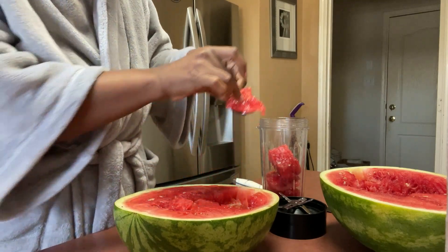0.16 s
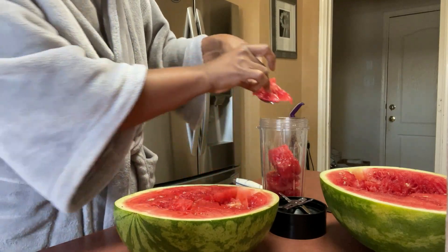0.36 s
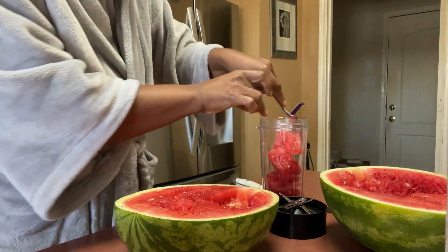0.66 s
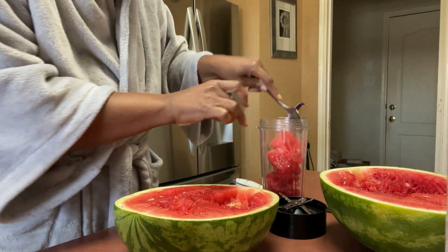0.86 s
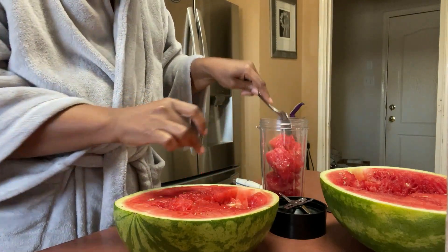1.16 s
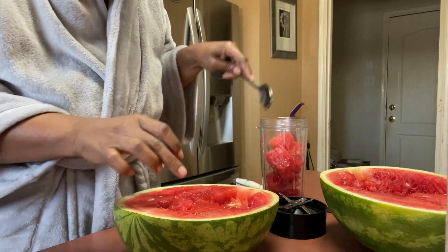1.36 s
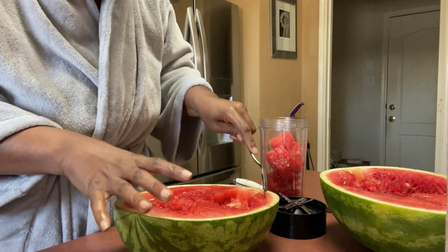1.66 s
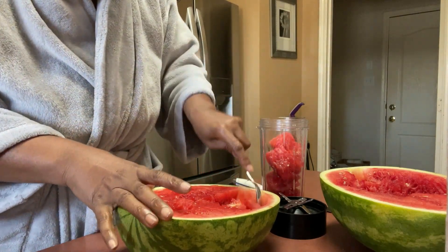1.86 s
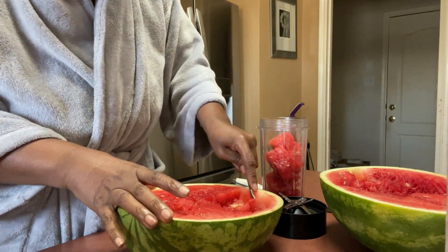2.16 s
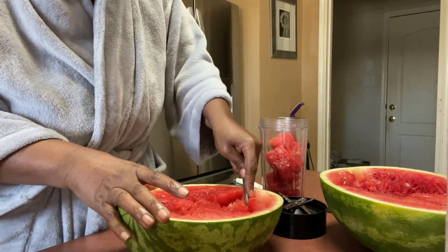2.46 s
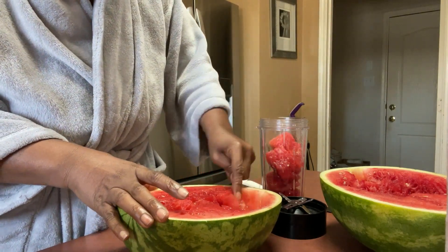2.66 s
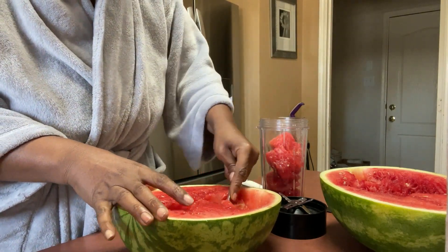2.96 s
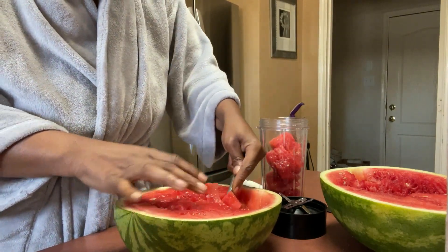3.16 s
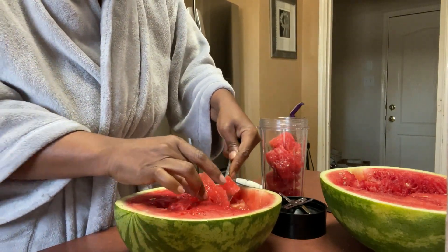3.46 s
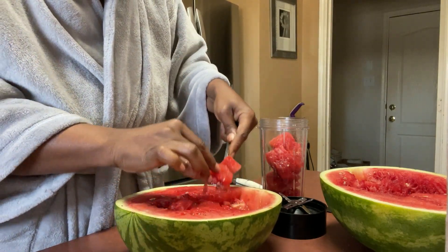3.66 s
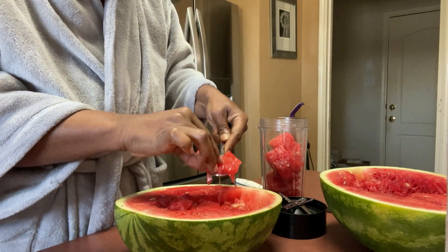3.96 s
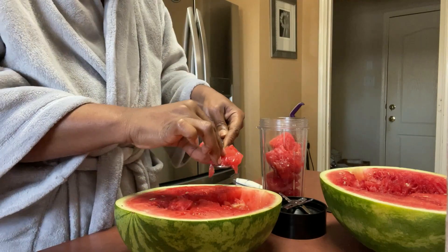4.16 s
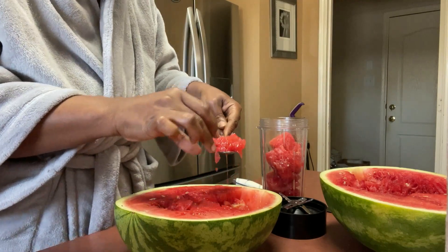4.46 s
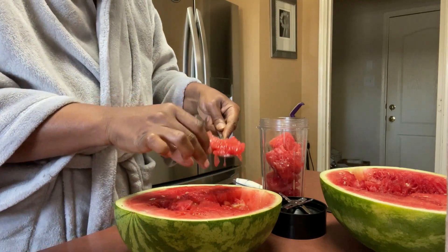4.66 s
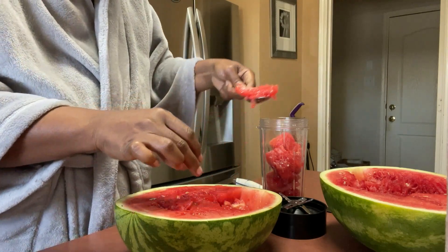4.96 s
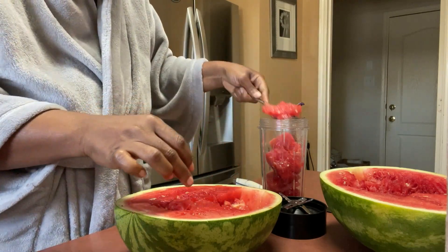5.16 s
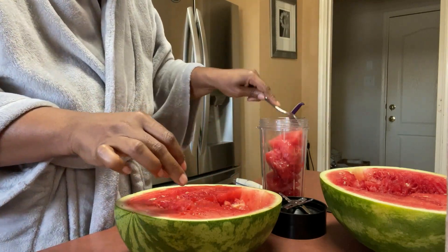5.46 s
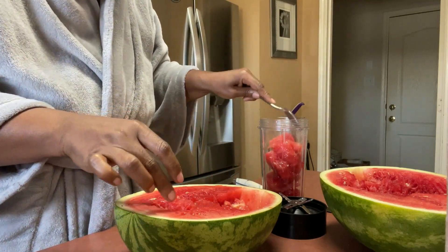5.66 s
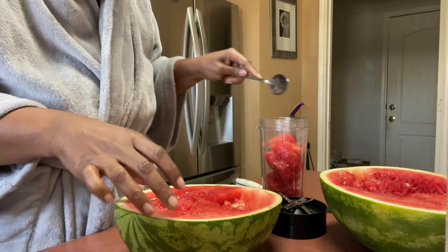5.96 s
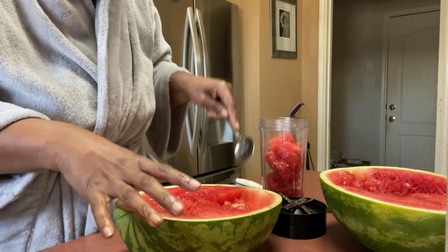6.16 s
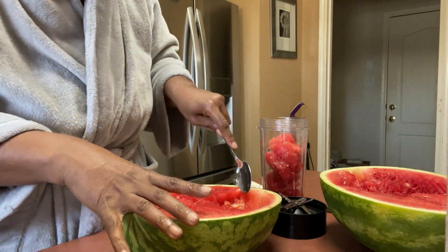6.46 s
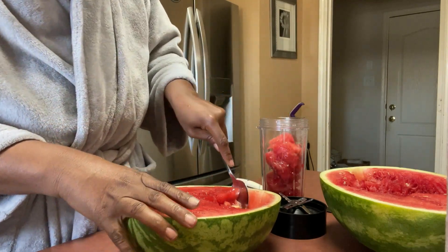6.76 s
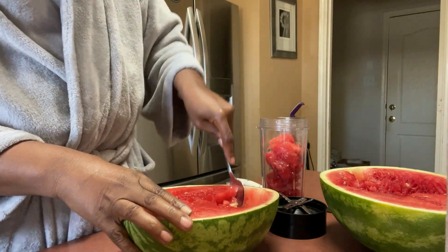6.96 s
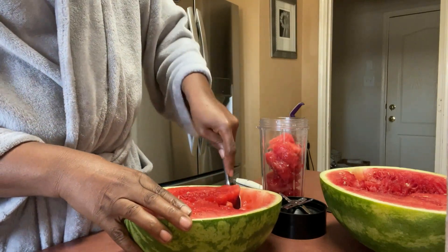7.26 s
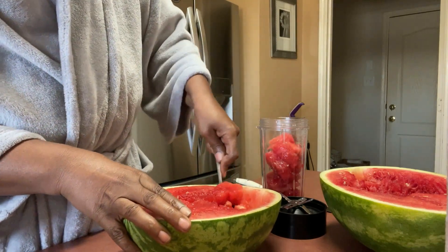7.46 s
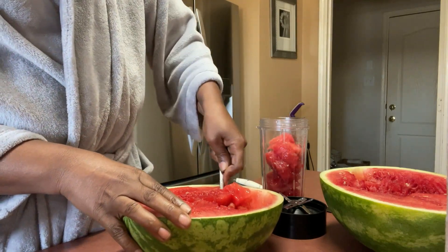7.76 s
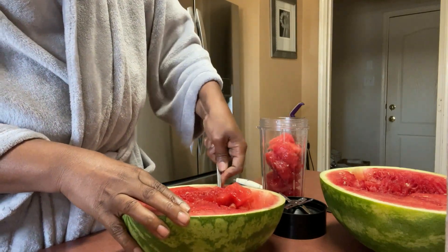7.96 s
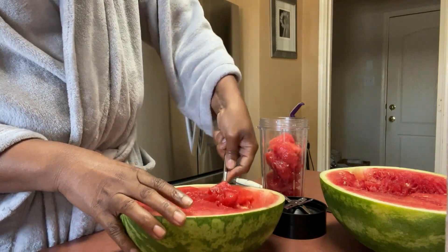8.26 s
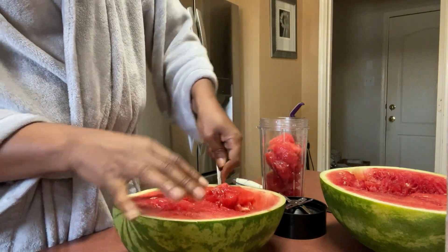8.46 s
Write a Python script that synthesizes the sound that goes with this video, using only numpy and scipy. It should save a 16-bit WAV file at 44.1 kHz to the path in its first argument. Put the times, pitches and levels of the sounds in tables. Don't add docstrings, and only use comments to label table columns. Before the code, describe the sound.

A low, steady appliance hum with a slow beat fills a home kitchen. Close by, slightly right, a spoon scrapes and crunches into a watermelon half in short strokes, with wet snaps and a pop. After a quiet handling gap, a lump drops into a tall plastic cup with a dull, hollow plop and table thud. Digging resumes, peaking in a loud juicy crack and squelch, then small crisp cuts. Close stereo microphone, short room reverberation.

```python
import sys
import numpy as np
from scipy import signal
from scipy.fft import rfft, irfft
from scipy.io import wavfile

SR = 44100
rng = np.random.default_rng(int(sys.argv[2]) if len(sys.argv) > 2 else 0)


def int16_out(signal):
    q = np.round(np.clip(np.atleast_2d(signal).T, -1, 1) * 32767)
    wavfile.write(sys.argv[1], SR, q.astype(np.int16))


def how_loud(loudness_db):
    steps = np.asarray(loudness_db, float) / 20
    return 10 ** steps


N = 379260

# pitch_hz, level_db (rms), crest_s, left_over_right_db
HUM_TONES = [
    (56.51, -48.4, .314, 2.3),
    (59.19, -44, .314, 4.2),
    (119.95, -33.8, .009, 1.2),
    (137.03, -39.5, .009, 1.7),
    (256.98, -59, .009, 1),
]
# pitch_hz, level_db (per Hz)
RUMBLE_SPECTRUM = [(15, -48), (25, -27), (70, -10), (102, -9.5), (130, -5.5), (149, -11), (190, -12.5),
                   (269, -20.5), (574, -38.5), (2980, -59.5), (10600, -66.5), (11800, -65), (12800, -99),
                   (13900, -91.5), (15900, -102)]
# pitch_hz, likeness (-1 to 1)
SIDE_LIKENESS = [(60, 0.8), (180, 0.736), (550, -0.39), (1650, -0.09), (4970, -0.02), (15000, -0.42)]
# pitch_hz, t60_s, level_db
ROOM_TAIL = [(200, .45, 6), (700, 0.3904, 4.5), (1500, 0.3754, 3), (4700, 0.375, -2), (13700, 0.22, -3)]
# start_s, peak_db, pitch_hz, t60_s
TABLE_THUDS = [
    (1.932, -25, 67.4, 0.171),
    (1.948, -36, 200, 0.063),
    (2.14, -39.5, 331, 0.082),
    (2.452, -36.5, 64.8, 0.216),
    (5.387, -26, 74.1, 0.14),
    (5.386, -16.5, 111.4, 0.098),
    (5.3934, -15, 108.1, 0.0694),
]
# pitch_hz, level_db, t60_s
CUP_MODES = [(182, -18.5, 0.048), (236.5, -6.5, 0.067), (288.4, -5.5, .05), (361.8, -7, 0.0686),
             (452, -1, 0.0644), (555, -10, 0.054), (701, -7.5, 0.0416), (962.3, -12.5, 0.053),
             (1245, -15.5, 0.017), (4970, -22, 0.01)]
# length_s, pitch_hz, width_hz, level_db (rms)
CUP_SPLASH = [(.12, 3410, 1600, -54), (0.141, 2320, 740, -54), (0.043, 1100, 530, -46),
              (0.063, 1350, 960, -58.5)]
# pitch_hz, level_db (rms)
SPOON_RING = [(6950, -74), (10800, -76), (13900, -74), (15200, -74)]
# start_s, length_s, pitch_hz, level_db (rms)
JUICE_SIZZLE = [(0, 0.174, 2280, -53.5), (0, 0.2, 3350, -60), (2.67, 0.0316, 3636, -45),
                (2.747, 0.11, 5820, -54.5), (2.884, 0.046, 2123, -59), (2.965, 0.065, 2690, -62.5),
                (3.133, 0.138, 3334, -55), (3.937, 0.101, 7760, -67.5), (5.473, 0.08, 2500, -66),
                (7.517, 0.045, 2010, -32.5), (7.505, .07, 1100, -38), (7.518, 0.075, 795, -34),
                (7.534, 0.122, 1422, -30), (7.548, 0.13, 2260, -44), (7.554, 0.095, 3944, -34),
                (7.621, 0.308, 1500, -46)]
# start_s, peak_db, pitch_hz
AIR_POCKETS = [(0.705, -35.5, 522), (2.528, -48.5, 1335), (2.653, -30.5, 2198), (2.679, -35.5, 1957),
               (6.964, -36.5, 521), (7.495, -30, 556), (7.511, -30.5, 590), (7.523, -30, 680),
               (7.534, -26, 783), (7.545, -18.5, 1458), (7.559, -19.5, 899.4), (7.58, -33, 2350),
               (7.579, -24, 738), (7.598, -25, 942), (7.61, -27, 1500), (7.63, -25.5, 1308),
               (7.664, -42, 1480), (7.689, -26.5, 1455), (8.084, -35.5, 1525), (8.118, -29, 1758),
               (8.139, -44.5, 1570), (8.477, -50, 731)]
# start_s, peak_db, pitch_hz
CELL_TICKS = [(0.7055, -49, 5160), (1.7457, -51, 10600), (1.9123, -35, 10000), (2.633, -51.5, 3530),
              (2.7417, -22.5, 5970), (2.7872, -31, 10250), (2.9517, -42, 5940), (3.1283, -47, 4970),
              (3.4072, -52.5, 3330), (3.8912, -52, 5400), (3.9404, -42.5, 7300), (4.8894, -57.5, 3540),
              (6.6368, -42.5, 6660), (6.969, -30, 3890), (7.512, -41, 6000), (7.5544, -22.5, 3630),
              (7.575, -6.5, 4053), (7.5784, -15, 3830), (8.086, -18, 9401), (8.1173, -26, 6700),
              (8.1391, -31, 3630), (8.552, -60.5, 3560)]
# start_s, peak_db, pitch_hz
SUCTION_POPS = [
    (0.7038, -56.5, 1250),
    (1.911, -38, 2064),
    (2.7231, -20.5, 1517),
    (2.9521, -29.5, 2408),
    (3.1276, -47.5, 1790),
    (3.4067, -31, 1800),
    (7.524, -19.5, 1950),
    (7.5779, -9, 1640),
    (8.086, -49.5, 1590),
]
# start_s, peak_db, pitch_hz
THIN_SNAPS = [
    (2.743, -61.5, 14600),
    (2.7866, -38.5, 14600),
    (7.5526, -26, 14600),
    (7.5724, -11.5, 14060),
    (7.5794, -21, 14300),
]
# peak_s, cut_db, rise_s (per 20 dB), fall_s (per 20 dB), tearing_db (over the cut)
SPOON_STROKES = [(1.775, -60, .08, .05, -4), (1.878, -65.5, -0.23, -0.05, -0.5),
                 (1.97, -44.5, 0.17, 0.3255, 0), (2.158, -33, 0.084, 0.1, -9),
                 (2.392, -31.5, 0.0759, 0.0728, -9), (2.66, -37, 0.0562, 0.0171, -16.5),
                 (2.727, -51, -0.16, -0.1042, -28), (2.748, -61, -0.95, 0.29, 4),
                 (2.958, -63, -0.66, 0.37, -10.5), (3.407, -56, 0.0316, -0.1137, -10),
                 (6.645, -56, 0.0577, .5, 2.5), (6.8, -50, 0.2668, 0.12, -2.5),
                 (6.975, -37.5, 0.0354, -0.02, -5), (7.04, -58, 0.2113, 0.01, 5),
                 (7.13, -55.5, 0.0949, -0.82, -2.5), (7.205, -44, 0.09, 0.4869, -0.5),
                 (7.46, -42, 0.36, 0.04, -13), (7.532, -39, -0.0336, 0.277, -28),
                 (7.588, -31.5, 0.078, 0.0811, -11.5), (7.7, -43.5, 0.0738, 0.2272, -13.5),
                 (8.06, -47, .12, .1, -5), (8.089, -38, .015, .015, 5), (8.141, -29.5, .035, .022, -7),
                 (8.17, -50, -0.36, 0.15, -5)]
# peak_s, cut_db, rise_s (per 20 dB), fall_s (per 20 dB), tearing_db (over the cut)
HAND_SHIFTS = [(.004, -62.5, .01, 0.117, -27), (.26, -63.5, 0.21, 0.592, -5.5), (.704, -64.5, .01, .12, -7),
               (1.08, -65.5, 0.14, 0.37, -13), (1.21, -67, 0.55, 0.0526, -11.5),
               (2.546, -67, .1, .13, -16.5), (3.224, -66.5, 0.3, 0.138, -8.5), (3.43, -70, .015, .06, -2),
               (3.815, -69.5, .03, 0.103, -17.5), (3.895, -68.5, .02, .1, 3), (7.96, -61, 0.35, 0.148, -11),
               (8.462, -66, 0.022, .4, -14.5), (8.599, -56.5, 0.014, 0.043, -3)]
# start_s, end_s
SPOON_PAUSES = [
    (1.4, 1.742),
    (1.8, 1.858),
    (2.04, 2.1),
    (2.51, 2.628),
    (2.81, 2.94),
    (6.4, 6.636),
    (6.88, 6.94),
    (7.14, 7.178),
    (7.86, 7.97),
]
# pitch_hz, width_hz, level_db
MELON_HOLLOW = [(1500, 510, -3.5), (2375.7, 226, 0), (3454, 960, -5.5)]
# pitch_hz, level_db (per Hz)
TEARING_SPECTRUM = [(1760, -33), (3000, -8), (3730, 4.5), (4720, -3.5), (6030, -0.5), (8490, -7.5),
                    (10300, -2.5), (11800, -11), (12600, -12.5), (13800, -10), (15900, -14)]

DROP_S, DROP_DB = 5.381, -15.5
POCKET_T60_S, POCKET_DAMPING = 0.0576, .2
REST_DB, EASE_S, BITE_S = -11.5, 0.0255, 0.0036
TEAR_FOLLOWS, PUSH_FOLLOWS = 0.919, 0.959
PUSH_LAGS = 0.27


def rms_one(x):
    return x / np.sqrt(np.mean(x ** 2) + 1e-20)


def at_hz(points, hz):
    points = np.array(points)
    return np.interp(np.log(hz), np.log(points[:, 0]), points[:, 1])


def drift(rate_hz):
    r = np.exp(-80 * np.pi * rate_hz / SR)
    slow = signal.lfilter([1], [1, -2 * r, r * r], rng.standard_normal(N // 40 + 2002))[2000:]
    return np.interp(np.arange(N) / 40, np.arange(len(slow)), rms_one(slow))


def band(x, low_hz, high_hz):
    edges = [low_hz, min(high_hz, .45 * SR)]
    return signal.sosfilt(signal.butter(2, edges, "band", fs=SR, output="sos"), x)


def add(out, start_s, sound):
    i = int(start_s * SR)
    out[i:i + len(sound)] += sound[:N - i]


def ping(hz, t60, rise=0., soft_s=0.00025):
    t = np.arange(int(t60 * SR) + 8) / SR
    tone = np.sin(2 * np.pi * hz * t * (1 + rise * t / t60))
    return tone * how_loud(-60 * t / t60) * (1 - np.exp(-t / soft_s))


def grains(per_s, spread_db):
    sizes = how_loud(spread_db * np.minimum(rng.exponential(1, N), 5)) * rng.choice([-1, 1], N)
    return sizes * (rng.random(N) < per_s / SR)


def hum():
    t, out = np.arange(N) / SR, 0
    for hz, level_db, crest_s, pan_db in HUM_TONES:
        wobble_db = 1.5 if 130 < hz < 140 else 0.4234
        level = np.sqrt(2) * how_loud(level_db + 4 + wobble_db * drift(3))
        tone = level * np.cos(2 * np.pi * hz * (t - crest_s))
        out = out + tone * how_loud(pan_db / 2 * np.array([[1], [-1]]))
    return out


def rumble():
    out, edges = 0, 25 * 2 ** np.arange(0, 9.6, .5)
    white = rng.standard_normal((2, 2, N))
    for k, (low, high) in enumerate(zip(edges, edges[1:])):
        mid, side = band(white[k % 2], low, high)
        hz = np.sqrt(low * high)
        alike = np.clip(at_hz(SIDE_LIKENESS, hz), -1, 1)
        gain = how_loud(at_hz(RUMBLE_SPECTRUM, hz) + 2.376 * drift(15))
        out = out + gain * (np.sqrt(1 + alike) * mid + np.sqrt(1 - alike) * side * [[1], [-1]])
    return how_loud(-37) * rms_one(out) * how_loud([[.6], [-.6]])


def kitchen(x):
    t, tail = np.arange(SR // 2) / SR, 0
    white = rng.standard_normal((2, SR // 2)) * (1 - np.exp(-t / 0.00043))
    for low in 120 * 2 ** np.arange(7):
        level_db = at_hz(np.array(ROOM_TAIL)[:, ::2], 2.535 * low)
        t60 = at_hz(ROOM_TAIL, 1.2 * low)
        tail = tail + band(white, low, 2 * low) * how_loud(level_db - 60 * t / t60)
    tail = tail / np.sqrt(np.sum(tail ** 2) / 2)
    return signal.fftconvolve(tail, x[None], axes=1)[:, :N]


def at_ports(x, lag_s):
    hz = np.fft.rfftfreq(N, 1 / SR)
    late = np.exp(-2j * np.pi * hz * lag_s / (1 + (hz / 11224) ** 8))
    table_s = np.array([[0.0010317], [0.001587]])
    bounce = 0.26 * np.exp(-2j * np.pi * hz * table_s) / (1 + (hz / 6000) ** 2)
    glint = .5 * np.exp(-2j * np.pi * hz * 0.0028) / (1 + (5500 / (hz + 1)) ** 6) * [[1], [-1]]
    return irfft(rfft(x) * (np.array([late, np.ones_like(late)]) + bounce + glint), N)


def thuds():
    out = np.zeros(N)
    for start_s, peak_db, hz, t60 in TABLE_THUDS:
        add(out, start_s, how_loud(peak_db + 14.5) * ping(hz, t60, soft_s=0.0138))
    return out


def drop():
    out = np.zeros(N)
    for hz, level_db, t60 in CUP_MODES:
        add(out, DROP_S, how_loud(DROP_DB + level_db) * ping(hz, t60, soft_s=0.00118))
    slap = band(rng.standard_normal(4096), 600, 4300) * how_loud(-60 * np.arange(4096) / SR / 0.055)
    add(out, DROP_S, how_loud(DROP_DB - 18.5) * slap)
    return band(out, 140, 5500)


def sizzle():
    out, flutter = np.zeros(N), how_loud(3.6 * drift(30))
    rows = [(start_s, length, hz, .15 * hz, level_db) for start_s, length, hz, level_db in JUICE_SIZZLE]
    rows += [(DROP_S + 0.0033, *row) for row in CUP_SPLASH]
    rows += [(6.405, .3, hz, 300, level_db) for hz, level_db in SPOON_RING]
    for k, (start_s, length, hz, width, level_db) in enumerate(rows):
        noise = band(rng.standard_normal(SR // 2), hz - width / 2, hz + width / 2)
        x = np.arange(SR // 2) / SR / length
        swell = np.minimum(x * 10, 1) * np.exp(-2 * x ** 2)
        own_flutter = flutter[k * SR // 4:][:SR // 2]
        add(out, start_s, how_loud(level_db) * rms_one(noise) * swell * own_flutter)
    return out


def squelch():
    out = np.zeros(N)
    chances = rng.random((len(AIR_POCKETS), 2))
    for (start_s, peak_db, hz), (ratio, late) in zip(AIR_POCKETS, chances):
        t60 = POCKET_T60_S * (hz / 1000) ** -POCKET_DAMPING
        add(out, start_s, how_loud(peak_db) * ping(hz, t60, rise=0.12, soft_s=0.00023))
        neighbour = ping(hz * (1.5 + 0.21 * ratio), t60 * 0.36, rise=0.061)
        add(out, start_s + 0.0041 * late, how_loud(peak_db - 19.5) * neighbour)
    return out


def ticks():
    out, t = np.zeros(N), np.arange(2048) / SR
    # rows, t60 (s), share of wide noise, its low and high edge (Hz)
    kinds = ((CELL_TICKS, .016, .3, 3000, 13000),
             (SUCTION_POPS, 0.011, .4, 800, 3300),
             (THIN_SNAPS, 0.026, .1, 9000, 15800))
    for rows, t60, wide, low_hz, high_hz in kinds:
        for start_s, peak_db, hz in rows:
            noise = rng.standard_normal(2048) * how_loud(-60 * t / t60)
            noise[0] = 4.0
            snap = band(noise, hz / 1.12, hz * 1.2) + wide * band(noise, low_hz, high_hz)
            add(out, start_s, how_loud(peak_db) * snap / np.abs(snap).max())
    return out


def stroke_levels():
    t = np.arange(0, N, 32) / SR
    cut, tear, push = np.zeros((3, len(t)))
    rest = sum(np.clip(np.minimum((t - a) / EASE_S, (b - t) / BITE_S), 0, 1) for a, b in SPOON_PAUSES)
    # rows, dull push over the cut (dB), dip at rest (dB)
    for rows, push_db, rest_db in ((SPOON_STROKES, -5, REST_DB * rest), (HAND_SHIFTS, 0, 0)):
        for peak_s, cut_db, rise_s, fall_s, tear_db in rows:
            away = np.maximum((peak_s - t) / abs(rise_s), (t - peak_s) / abs(fall_s))
            swell_db = -20 * away + rest_db
            cut += how_loud(cut_db + swell_db)
            tear += how_loud(cut_db + tear_db + TEAR_FOLLOWS * swell_db)
            push += how_loud(cut_db + push_db - PUSH_LAGS * (cut_db + 51) + PUSH_FOLLOWS * swell_db)
    return [np.interp(np.arange(N) / SR, t, level) for level in (cut, tear, push)]


def spoon():
    cut, tear, push = stroke_levels()
    clumps = how_loud(0.99 * drift(38))
    cells = grains(5000, 2.9) * clumps
    hollow = 0
    for k, (hz, width, level_db) in enumerate(MELON_HOLLOW):
        r = np.exp(-np.pi * width / SR)
        poles = [1, -2 * r * np.cos(2 * np.pi * hz / SR), r * r]
        ring = signal.lfilter([1 - r * r, 0, r * r - 1], poles, cells)
        hollow = hollow + (-1) ** k * how_loud(level_db + 2.9 * drift(18)) * ring
    fine = grains(12000, 3.0) * clumps
    edges, bright = 3000 * 2 ** np.arange(0, 2.5, .2), 0
    for low, high in zip(edges, edges[1:]):
        level_db = at_hz(TEARING_SPECTRUM, np.sqrt(low * high)) + 2.44 * drift(18)
        bright = bright + how_loud(level_db) * band(fine, low, high)
    crunch = cut * rms_one(band(hollow, 900, 4000))
    return crunch + tear * rms_one(bright) + push * rms_one(band(cells, 330, 1077))


def scene():
    snaps, cup = ticks(), drop()
    melon = spoon() + snaps + squelch() + sizzle()
    direct = (at_ports(melon, 0.0001503) + at_ports(cup, .00005)) * how_loud(-1.0)
    room = how_loud(-6.5) * kitchen(melon - .4 * snaps + cup)
    return hum() + rumble() + direct + room + thuds() * how_loud([[.8], [-.8]])


def roll_off(x):
    return signal.sosfilt(signal.butter(12, 16070, fs=SR, output="sos"), x)


def record(dry):
    mid, side = (dry[0] + dry[1]) / 2, (dry[0] - dry[1]) / 2
    mid = signal.sosfilt(signal.cheby2(4, 30, (12300, 13150), "bandstop", fs=SR, output="sos"), mid)
    side = signal.sosfilt(signal.cheby2(4, 30, (10000, 11000), "bandstop", fs=SR, output="sos"), side)
    side = signal.sosfilt(signal.ellip(6, 1, 35, 14400, fs=SR, output="sos"), side)
    top_cut = signal.ellip(10, 1, 60, 15800, fs=SR, output="sos")
    heard = signal.sosfilt(top_cut, [mid + side, mid - side])
    return roll_off(heard)


dry = scene()
out = record(dry)
int16_out(out)
```